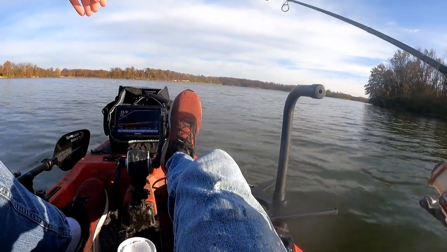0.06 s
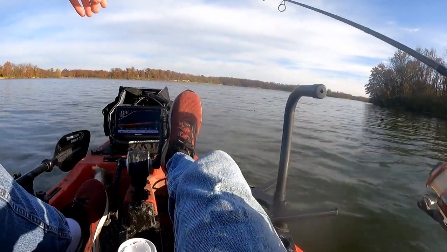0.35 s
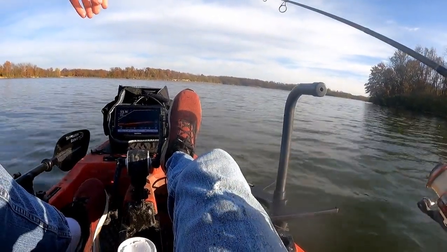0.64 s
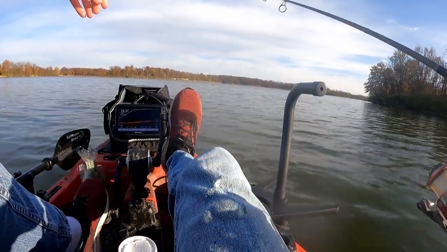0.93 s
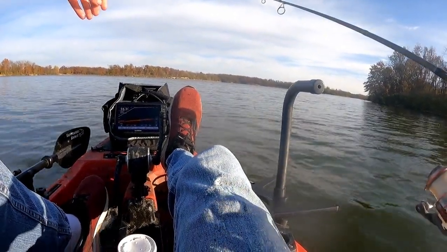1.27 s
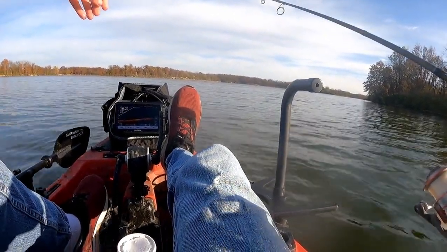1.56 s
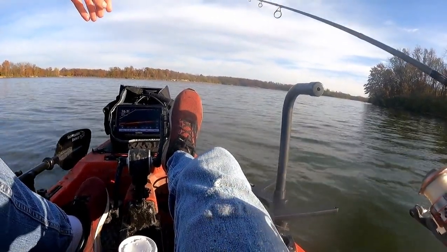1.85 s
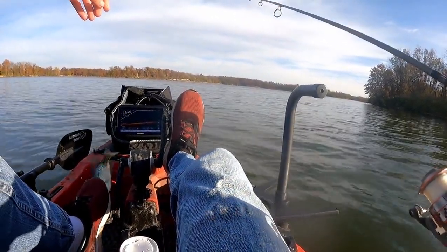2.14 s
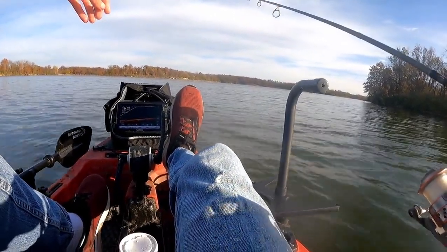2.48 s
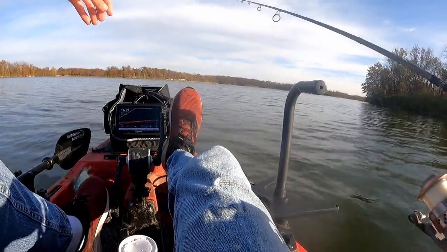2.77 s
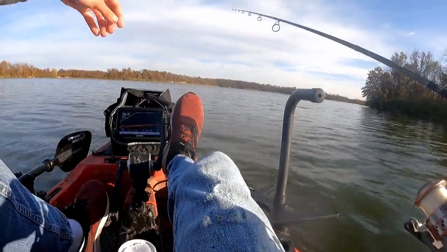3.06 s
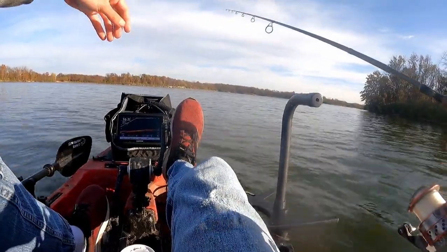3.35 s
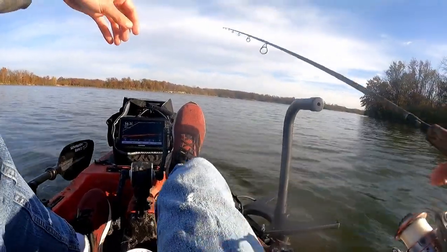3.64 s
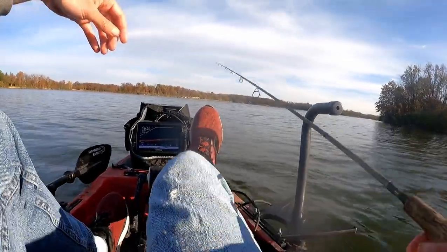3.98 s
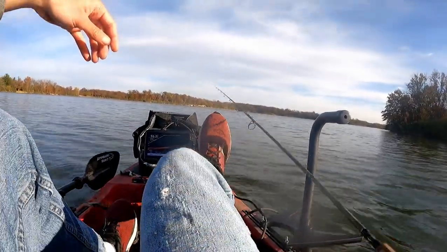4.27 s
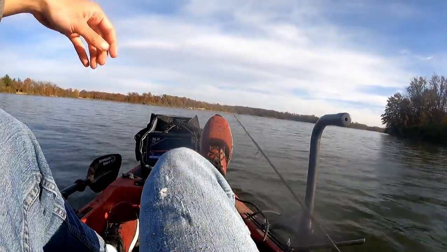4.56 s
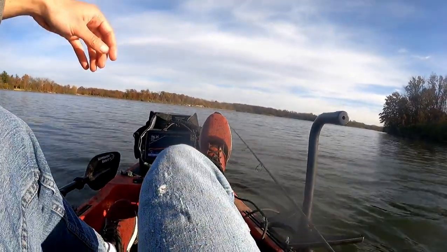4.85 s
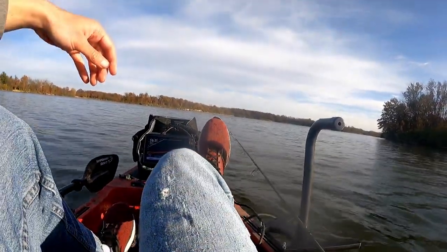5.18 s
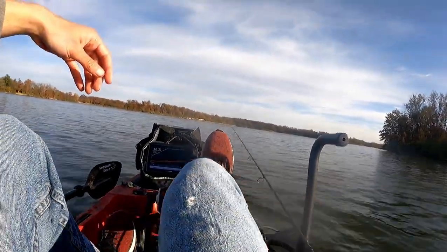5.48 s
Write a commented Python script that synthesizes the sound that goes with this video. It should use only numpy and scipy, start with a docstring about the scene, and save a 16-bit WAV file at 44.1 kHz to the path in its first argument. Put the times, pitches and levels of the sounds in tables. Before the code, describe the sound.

A wet fish flops on the floor of a plastic kayak, close to a body-worn microphone. Its body thumps the hollow hull in uneven bursts while its tail smacks the wet deck, with small squelches, drips and slithering between flips. The flopping dies down, then dull bumps hit the microphone, and two hull knocks and a hard clack of gear finish. A low boat rumble and faint lake wash lie underneath.

```python
"""A wet fish flops on the floor of a plastic kayak on a calm lake, heard from a body-worn camera.
Its body thumps the hollow hull, its tail smacks the wet deck and flings drops, short wet squelches
come from under it, and it slithers between flips. Underneath sit the rumble of the rocking boat and
the quiet wash of the lake, with one faint lap of water near the end. The angler shifts in the seat:
the camera mount bumps, the hull takes two knocks and hard gear clacks against the gunwale."""
import sys
import numpy as np
from scipy import signal
from scipy.fft import rfft, irfft
from scipy.io import wavfile

SR = 44100
rng = np.random.default_rng(int(sys.argv[2]) if len(sys.argv) > 2 else 0)


def waveform_to_disk(signal):
    """Save audio, clipped to [-1, 1], as 16-bit WAV at the path in sys.argv[1]."""
    frames = np.transpose(np.atleast_2d(signal))
    scaled = np.clip(frames, -1, 1) * 32767
    samples = np.round(scaled).astype(np.int16)
    wavfile.write(sys.argv[1], SR, samples)


N = 243431
TIME, FREQ = np.arange(N) / SR, np.fft.rfftfreq(N, 1 / SR)
PANEL_HZ = 430  # hull modes above this are panel modes and need a hard blow

# slow swell of the boat and air on the microphone: t/s, level/dB
SWELL = [(0, -40), (0.11, -24.5), (0.27, -44.5), (0.48, -45), (0.6, -36), (0.82, -50.5), (1.25, -34.5),
         (1.58, -45), (1.71, -27.5), (1.92, -44), (2.53, -36), (3.05, -43.5), (3.57, -34), (4.3, -39),
         (4.7, -38), (5.0, -30), (5.3, -30.5), (5.52, -21)]
# EQ curves of the boat's rumble and the lake's wash: f/Hz, level/dB
RUMBLE_EQ = [(10, -22.5), (25, -10), (48, 2.5), (85, -8), (130, -10.5), (200, -15.5), (300, -19.5),
             (450, -42.5), (800, -60.5), (2000, -74.5)]
LAKE_EQ = [(200, -11), (400, 0.5), (700, -13), (1600, -13.5), (3000, -23), (7500, -28), (9500, -38.5),
           (16000, -43)]
# the body lands: t/s, thump level/dB, struck spot f/Hz, hardness/dB on panel modes, spray level/dB
FLOPS = [(0.015, -9.5, 237.4, -15, -15), (0.33, -29.5, 306, -22, -48), (0.587, -17, 273, -15, -17.5),
         (0.626, -17, 160.6, -5.5, -39), (0.671, -12, 206, 1, -22), (0.872, -17, 218, -17.5, -22.5),
         (1.176, -15.5, 256, -27, -38), (1.249, -26.5, 159, -19, -39), (1.397, -14, 199, -19, -24),
         (1.43, -26, 171, -8.5, -25), (1.782, -22.5, 183, -19, -26.5), (1.808, -14, 341, -19.5, -28),
         (1.957, -21.5, 226, -4, -35), (2.078, -23.5, 278, -23, -73), (2.114, -23.5, 370, -27, -30.5),
         (2.443, -18, 360, -18.5, -19), (2.476, -17, 164, -7.5, -47), (2.58, -16, 273, -16, -18.5),
         (2.664, -29, 187, -30, -41), (3.125, -9.5, 269, -21, -27.5), (3.155, -14.5, 151, -21, -15),
         (3.175, -16, 150, -16, -53), (3.257, -9, 172, -10, -24), (3.721, -23, 352, -15.5, -37.5),
         (3.789, -19.5, 148, -35, -29.5), (3.896, -20, 226, -7, -38), (3.963, -23.5, 259, -6, -64),
         (4.128, -19, 273, -21, -45.5), (4.229, -24, 289, -8.5, -51), (4.285, -23.5, 303, -6, -33.5),
         (4.319, -26, 148, -8, -47.5), (4.386, -29, 268, -3, -43.5), (4.455, -16, 160, -27, -19.5),
         (4.482, -21.5, 274, -20, -36), (4.508, -22, 149, -24, -49), (4.555, -23.5, 192, -13, -22.5)]
# modes of the hollow hull, before the blow weights and damps them: f/Hz, level/dB, t60/s
HULL_MODES = [(79.25, -28, 0.37), (120.7, -5, 0.27), (152.4, -2, 0.15), (179.2, -5.5, 0.27),
              (215.8, 0.5, 0.17), (265.5, 0, 0.14), (294, 3, 0.07), (350, -2, 0.16), (397.3, -13, 0.22),
              (468, 4.5, 0.17), (518, 6.5, 0.13), (621, 2.5, 0.18), (708, 12, 0.066), (989, 4, 0.11)]
# EQ curves of bright spray and fleshy smack: f/Hz, level/dB
SPRAY_EQ = [(1500, -18.5), (2800, -10.5), (3500, -1), (4000, -2.5), (4700, 3.5), (6000, 1), (7000, 0),
            (8200, -2), (9500, -13), (13000, -14), (16000, -22)]
SMACK_EQ = [(250, -10.5), (500, 7.5), (700, 7.5), (830, 0.5), (1000, 1), (1400, 1.5), (2400, 0.5),
            (3200, -4), (4500, -13.5), (8000, -51.5)]
# the tail alone flicks the wet deck: t/s, spray level/dB
TAIL_FLICKS = [(0.11, -26.5), (0.215, -34), (0.2216, -40.5), (0.392, -24.5), (0.403, -20.5),
               (0.7343, -34.5), (1.677, -31), (1.765, -24.5), (2.38, -33), (2.397, -26.5), (2.438, -23.5),
               (2.617, -24.5), (2.833, -38), (2.852, -26.5), (3.459, -29.5), (3.533, -25), (3.732, -32.5),
               (4.618, -26.5), (4.718, -37.5)]
# larger drops on the deck: t/s, level/dB, f/Hz
BIG_DROPS = [(0.180, -35.5, 1230), (0.75, -35, 1430), (0.989, -38, 7700), (1.054, -40, 6740),
             (1.252, -21, 8750), (1.408, -18, 6950), (4.18, -34, 7200), (5.156, -36, 6500)]
# the fish wriggles over wet plastic: crest t/s, level/dB, swell and fade time/s
WRIGGLES = [(0.055, -47.5, 0.017), (0.135, -47, 0.034), (0.35, -53, 0.044), (0.92, -51, 0.043),
            (1.2, -50.5, 0.0052), (1.252, -50, 0.016), (1.661, -45, .028), (1.79, -47, 0.031),
            (2.11, -50, 0.032), (2.357, -45, .012), (2.835, -47, 0.041), (3.085, -56, 0.019),
            (3.17, -41.5, 0.034), (3.51, -54.5, .05), (3.74, -61.5, 0.11), (3.993, -50.5, 0.056),
            (4.18, -54, 0.043), (4.505, -41, 0.043), (4.68, -51, 0.029)]
# short wet squelches from under the fish and, last, one faint lap of water: t/s, level/dB, f/Hz, t60/s
SQUELCHES_AND_LAP = [(0.127, -33.5, 1680, 0.064), (0.221, -44, 1390, 0.018), (0.315, -45.5, 1700, 0.039),
                     (0.391, -32.5, 3080, 0.055), (0.627, -48, 1500, 0.031), (1.808, -37.5, 1010, 0.033),
                     (2.476, -31, 1430, 0.042), (2.58, -33.5, 2100, 0.054), (2.617, -30.5, 2410, 0.017),
                     (3.126, -28, 970, 0.17), (3.155, -25.5, 990, 0.0079), (3.533, -30, 3070, 0.015),
                     (3.908, -35, 1010, 0.033), (3.976, -35.5, 860, 0.077), (4.212, -43, 1060, .05),
                     (4.23, -38, 925, 0.035), (4.455, -24.5, 900, 0.023), (4.507, -27, 2540, 0.046),
                     (4.868, -49.5, 1160, 0.074)]
# dull bumps on the camera mount: t/s, level/dB, f/Hz
MOUNT_BUMPS = [(2.273, -20, 76), (4.565, -15.5, 93), (4.812, -19, 114), (4.832, -15.5, 103),
               (4.965, -18.5, 109), (5.111, -22, 126), (5.137, -15.5, 100), (5.238, -17, 85),
               (5.319, -19.5, 110), (5.361, -11.5, 46.7), (5.408, -13, 64.4), (5.426, -9, 162.4)]
# the angler knocks the hull: t/s, level/dB, struck spot f/Hz, hardness/dB on panel modes
ANGLER_KNOCKS = [(5.426, -9.5, 192, -18), (5.473, -15.5, 292, -9)]
# gear hits the gunwale: t/s, attack level/dB
GEAR_HIT = (5.469, -18.5)
# resonances of that hit: f/Hz, level/dB, t60/s (sets the width)
GEAR_MODES = [(955, 5, 0.024), (1190, -36, 0.006), (2050, -12, 0.0036), (3300, -6, 0.0086),
              (6140, -21, 0.003), (11200, -40, 0.0009)]
# balance of the two microphone ports: f/Hz, left minus right level/dB
PORT_BALANCE = [(60, 1), (200, 0), (380, 2), (1300, 1.5), (4400, 0.5), (8000, 3.5), (15000, 1)]
# phase between the ports: f/Hz, lead of the left/rad
PORT_PHASE = [(100, 0.27), (300, 0.48), (600, -0.7), (1550, -0.22), (2760, -0.67), (4700, -0.19)]


def amp(db):
    """Decibels to gain."""
    return 10 ** (np.asarray(db) / 20)


def unit(x):
    """Scales to rms 1."""
    return x / np.sqrt(np.mean(x ** 2) + 1e-20)


def decay(t, t60):
    """Envelope that falls 60 dB in t60 seconds."""
    return np.exp(-np.log(1000) * t / t60)


def attack(t, rise_s):
    """Envelope that eases up from 0 to 1."""
    return 1 - np.exp(-t / rise_s)


def curve(points, hz):
    """Reads a curve on a log-frequency axis."""
    f, value = np.transpose(points)
    return np.interp(np.log(hz + 1), np.log(f + 1), value)


def bell(hz, centre_hz, db, octaves):
    """Bell-shaped EQ boost in dB."""
    return db * np.exp(-(np.log2((hz + 1) / centre_hz) / octaves) ** 2)


def resonances(modes, hz):
    """Power spectrum of damped modes: the shorter the ring, the wider the peak."""
    return sum(amp(db) ** 2 / (1 + ((hz - mode_hz) * t60 / 2) ** 2) for mode_hz, db, t60 in modes)


def eq(x, gain_db):
    """Causal filter with the given dB gain for each FFT bin of x."""
    n = x.shape[-1]
    cepstrum = irfft(np.log(amp(gain_db)), n)
    cepstrum[1:n // 2] *= 2
    cepstrum[n // 2 + 1:] = 0
    return irfft(rfft(x) * np.exp(rfft(cepstrum)), n)


def add(mix, s, sound):
    """Drops a sound into the mix at time s."""
    part = mix[max(round(s * SR), 0):][:len(sound)]
    part += sound[:len(part)]


def noise_bed(points, width):
    """Stereo noise under an EQ curve; width is the gain of side against mid."""
    mid, side = eq(rng.standard_normal((2, N)), curve(points, FREQ))
    return unit(np.array([mid + width * side, mid - width * side]))


def lake(level_db=-58):
    """Calm water all around: a faint, steady wash."""
    return amp(level_db) * noise_bed(LAKE_EQ, width=0.46)


def boat_rumble(rock_db=-18):
    """The boat rocks on the slow swell, and a little more after every flop."""
    rocking, t = np.zeros(N), np.arange(SR) / SR
    for s, thump_db, *_ in FLOPS:
        add(rocking, s, amp(thump_db + rock_db) * attack(t, rise_s=0.014) * decay(t, t60=0.46))
    swell = amp(np.interp(TIME, *np.transpose(SWELL)))
    return np.hypot(swell, rocking) * noise_bed(RUMBLE_EQ, width=0.19)


def hull_thumps(focus_db_per_octave=5, contact_s=0.0042, scatter=0.1, spot_db=7, heave_db=-9,
                sag_db=-7, sag_hz=135, lag_s=0.00091):
    """Each flop or knock bends the floor under it, which swings a few times and rings the hull."""
    out, t = np.zeros(N), np.arange(SR // 3) / SR
    mode_hz, mode_db, t60 = np.transpose(HULL_MODES)[:, :, None]
    panel = mode_hz > PANEL_HZ
    t60 = np.where(panel, t60 / 2, t60)  # the wet body lying on the panel damps it
    sag = amp(sag_db) * decay(t, t60=0.022) * np.sin(2 * np.pi * sag_hz * t)  # dead weight on the floor
    for s, db, spot_hz, hard_db, *_ in list(FLOPS) + list(ANGLER_KNOCKS):
        detune, sign = rng.uniform(-1, 1, (2, len(HULL_MODES), 1))  # each blow lands somewhere else
        octaves_off = abs(np.log2(mode_hz / spot_hz))
        weight = np.sign(sign) * amp(mode_db + panel * hard_db - focus_db_per_octave * octaves_off)
        weight[0] = amp(heave_db)  # the whole hull heaves wherever the blow lands
        push = attack(t, contact_s * spot_hz / mode_hz)  # soft flesh starts the low modes slowly
        tones = np.sin(2 * np.pi * mode_hz * (1 + scatter * detune) * t)
        ring = (weight * push * decay(t, t60) * tones).sum(0)
        swing = attack(t, contact_s) * decay(t, t60=0.075) * np.sin(2 * np.pi * spot_hz * t)
        blow = ring - amp(spot_db) * swing
        thump = blow / abs(blow).max() - sag
        add(out, s + lag_s, amp(db) * thump)  # the floor gives just after the skin touches
    return out


def crackle(size, per_s, spread_db, hiss):
    """Tiny, uneven pops of a wet film over a share of smooth hiss."""
    pops = (rng.random(size) < per_s / SR) * rng.choice([-1, 1], size)
    pops = pops * amp(spread_db * np.minimum(rng.exponential(1, size), 4))
    return unit(unit(pops) + hiss * rng.standard_normal(size))


def wet_burst(t60, grain, eq_db, tail_db=-27, rise_s=0.0012, crest_s=0.01):
    """A burst of water: quick swell, fast decay, faint wet tail. Returns start offset and sound."""
    t = np.arange(len(grain)) / SR - crest_s
    after = np.maximum(t, 0)
    swell = np.exp(np.minimum(t, 0) / rise_s)
    fade = decay(after, t60) + amp(tail_db) * decay(after, t60=0.25)
    sound = eq(grain * swell * fade, eq_db)
    return -crest_s, sound / np.linalg.norm(sound) * np.sqrt(crest_s * SR)


def wet_slaps(spray_db=-12, body_db=-13, tail_db=-14, hard_db=-14.5, hard_t60=0.024, size=8192):
    """Skin meets wet plastic in a bright spray and a hollow smack; harder slaps are tighter."""
    out, hz = np.zeros(N), np.fft.rfftfreq(size, 1 / SR)
    body_eq = curve(SMACK_EQ, hz) + bell(hz, centre_hz=1020, db=6, octaves=0.4)
    tail_eq = curve(SMACK_EQ, hz) - 12 * np.exp(-(hz / 800) ** 2)  # low cut: a tail has little flesh
    hits = [(s, wet_db, (thump_db + wet_db) / 2 + body_db, body_eq) for s, thump_db, *_, wet_db in FLOPS]
    hits += [(s, wet_db, wet_db + tail_db, tail_eq) for s, wet_db in TAIL_FLICKS]
    for s, wet_db, smack_db, flesh_eq in hits:
        t60 = hard_t60 * 2 ** ((hard_db - wet_db) / 31)  # twice as long for every 31 dB softer
        fine = crackle(size, per_s=5000, spread_db=5, hiss=0.82)
        coarse = crackle(size, per_s=2400, spread_db=4.5, hiss=0.71)
        offset, spray = wet_burst(t60, fine, curve(SPRAY_EQ, hz))
        offset, smack = wet_burst(t60, coarse, flesh_eq)
        add(out, s + offset, amp(wet_db + spray_db) * spray + amp(smack_db) * smack)
    return out


def bubbles(low_hz, high_hz, per_s, pitches=16):
    """Tiny bubbles in the slime burst one by one, each a ping of a few cycles."""
    out, t = np.zeros(N), np.arange(SR // 50) / SR
    for hz in np.geomspace(low_hz, high_hz, pitches):
        ping = np.sqrt(hz) * np.exp(-hz * t / 4) * np.sin(2 * np.pi * hz * t)
        pops = rng.random(N) < per_s / pitches / SR
        gains = amp(5 * np.minimum(rng.exponential(1, N), 3))
        out += signal.oaconvolve(pops * gains, ping)[:N]
    return unit(out)


def slither(fizz_db=-2, slime_db=1, murmur_db=5, skid_db=-31.5, skid_lag_s=0.016, skid_s=0.019):
    """Scales and slime drag over the deck in each wriggle and in the short skid that ends a flop."""
    skids = [(s + skid_lag_s, wet_db + skid_db, skid_s) for s, *_, wet_db in FLOPS]
    moves = list(WRIGGLES) + skids
    speed = sum(amp(db) * np.exp(-(abs(TIME - s) / length) ** 1.49) for s, db, length in moves)
    film = crackle(N, per_s=700, spread_db=5, hiss=0.6)
    fizz = unit(eq(film, curve(SPRAY_EQ, FREQ))) + 0.8 * bubbles(3500, 9000, per_s=200)
    slime = unit(eq(film, curve(SMACK_EQ, FREQ))) + 0.8 * bubbles(1100, 3000, per_s=120)
    hull = resonances([mode for mode in HULL_MODES if mode[0] < PANEL_HZ], FREQ)
    murmur = unit(eq(rng.standard_normal(N), 10 * np.log10(hull)))
    return speed * (amp(fizz_db) * fizz + amp(slime_db) * slime + amp(murmur_db) * murmur)


def drop(hz, size=1024):
    """One drop lands: a ping of a few cycles, splashier the smaller and higher it is."""
    t = np.arange(size) / SR
    splash = unit(eq(rng.standard_normal(size), curve(SPRAY_EQ, np.fft.rfftfreq(size, 1 / SR))))
    tick = np.exp(-hz * t / 6) * (np.sin(2 * np.pi * hz * t) + hz / 7000 * splash)
    return tick / abs(tick).max()


def droplets(flung_db=-22, max_flight_s=0.075, per_slap=2):
    """Drops tick on the deck; each slap flings a few more, which land a moment later."""
    out = np.zeros(N)
    for s, db, hz in BIG_DROPS:
        add(out, s, amp(db) * drop(hz))
    for s, *_, wet_db in list(FLOPS) + list(TAIL_FLICKS):
        for delay, pitch, weight in rng.random((per_slap, 3)):
            add(out, s + max_flight_s * delay, amp(wet_db + flung_db) * weight * drop(1500 * 5 ** pitch))
    return out


def squelches_and_lap(size=8192):
    """Short wet squelches from under the fish and one faint lap of water, each a pitched sputter."""
    out, hz = np.zeros(N), np.fft.rfftfreq(size, 1 / SR)
    for s, db, pitch_hz, t60 in SQUELCHES_AND_LAP:
        pitched_eq = curve(SMACK_EQ, hz) + bell(hz, pitch_hz, db=14, octaves=0.28)
        grain = crackle(size, per_s=2000, spread_db=7, hiss=0.69)
        offset, sputter = wet_burst(t60, grain, pitched_eq, tail_db=-34)
        add(out, s + offset, amp(db) * sputter)
    return out


def mount_bumps(cycles=5.2):
    """Dull, heavily damped knocks carried through the camera mount."""
    out, t = np.zeros(N), np.arange(SR // 5) / SR
    for s, db, hz in MOUNT_BUMPS:
        knock = sum(amp(mode_db) * np.sin(2 * np.pi * hz * ratio * rng.uniform(0.8, 1.24) * t)
                    for ratio, mode_db in [(0.55, -7), (1, 5), (1.7, -5), (2.6, -14)])
        knock *= attack(t, rise_s=0.0066) * decay(t, t60=cycles / hz)
        add(out, s, amp(db) * knock / abs(knock).max())
    return out


def gear_clack(rolloff_hz=8000, size=4096):
    """Hard gear chatters against the gunwale for a moment, in broad, well damped resonances."""
    out, t, hz = np.zeros(N), np.arange(size) / SR, np.fft.rfftfreq(size, 1 / SR)
    s, db = GEAR_HIT
    power = resonances(GEAR_MODES, hz) / (1 + (hz / rolloff_hz) ** 2)
    chatter = rng.standard_normal(size) * attack(t, rise_s=0.00017) * decay(t, t60=0.045)
    clack = eq(chatter, 10 * np.log10(power))
    add(out, s, amp(db) * clack / clack[:SR // 250].std())  # the first 4 ms set the level
    return out


def cockpit(x, echo_db=-9, low_cut_hz=550, shift_hz=1.297, echoes=120):
    """Brief treble reflections off deck, gear and legs, different per ear, shifting as the fish moves."""
    taps = np.zeros((2, 2, SR // 20))  # place, ear, delay
    for path in taps.reshape(4, -1):
        delay = rng.uniform(0.0003, 0.02, echoes)
        path[(delay * SR).astype(int)] = rng.choice([-1, 1], echoes) * decay(delay, t60=0.025)
    taps /= np.linalg.norm(taps, axis=2, keepdims=True)
    treble = signal.sosfilt(signal.butter(2, low_cut_hz, "high", fs=SR, output="sos"), x)
    turn = 2 * np.pi * shift_hz * TIME
    sends = treble * np.array([np.cos(turn), np.sin(turn)])  # steady crossfade between two places
    reflections = signal.oaconvolve(sends[:, None], taps, axes=2).sum(0)[:, :N]
    return x + amp(echo_db) * reflections


def microphone_ports(x):
    """The two ports catch each frequency at a slightly different level and phase."""
    half = np.array([[0.5], [-0.5]])
    balance = amp(half * curve(PORT_BALANCE, FREQ))
    phase = np.exp(1j * half * curve(PORT_PHASE, FREQ))
    return irfft(rfft(x) * balance * phase, N)


def scene():
    """The fish up close in the cockpit, over the lake; rumble and mount bumps lean to the right."""
    deck = hull_thumps() + wet_slaps() + squelches_and_lap() + slither() + droplets() + gear_clack()
    foreground = microphone_ports(cockpit(deck))
    bed = lake() + boat_rumble() * amp([[-1], [1]])
    return foreground + bed + mount_bumps() * amp([[-3.5], [2.5]])


def record(dry, cutoff_hz=16100):
    """The camera's band limit: a steep high cut."""
    high_cut = signal.firwin(255, cutoff_hz, window=("kaiser", 8), fs=SR)
    return signal.oaconvolve(dry, high_cut[None], "same")


dry = scene()
out = record(dry)
waveform_to_disk(out)
```